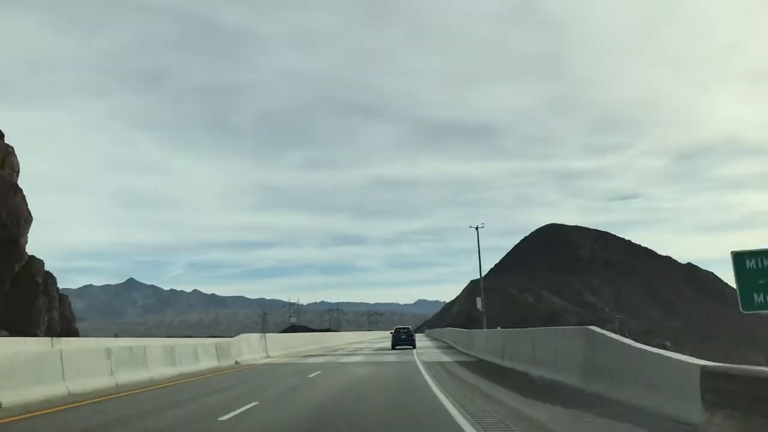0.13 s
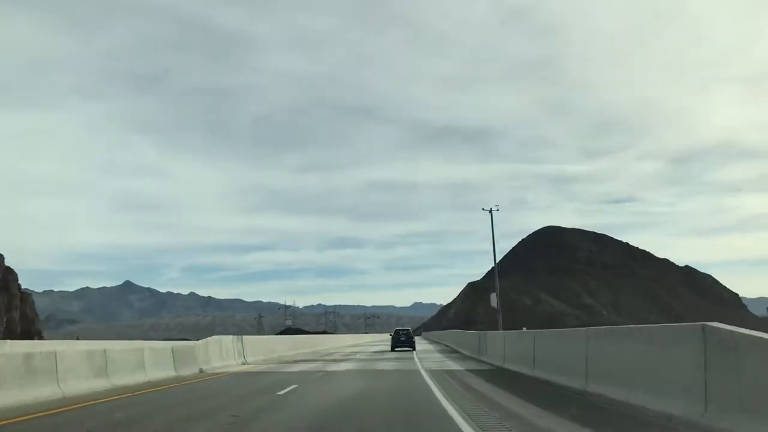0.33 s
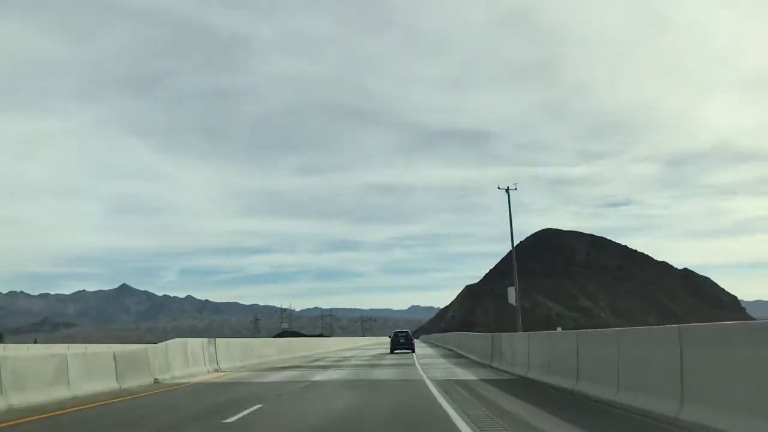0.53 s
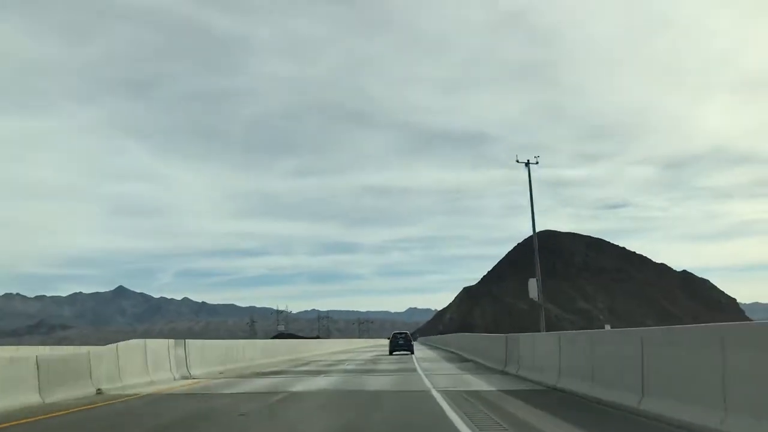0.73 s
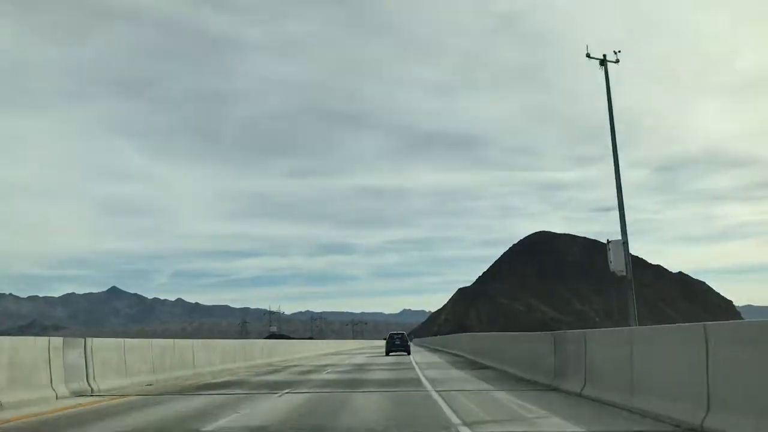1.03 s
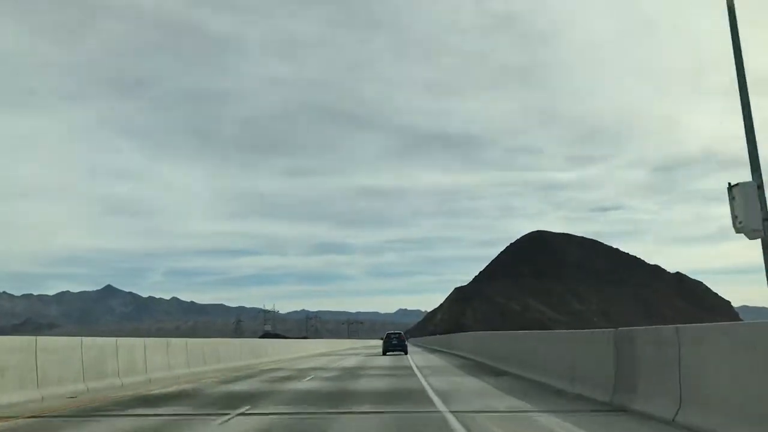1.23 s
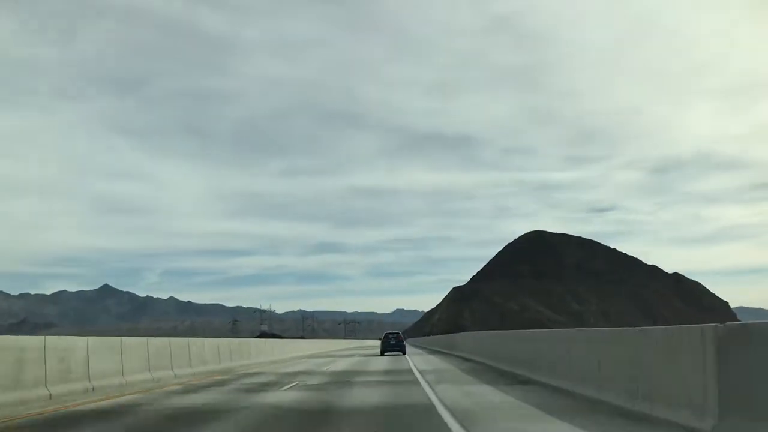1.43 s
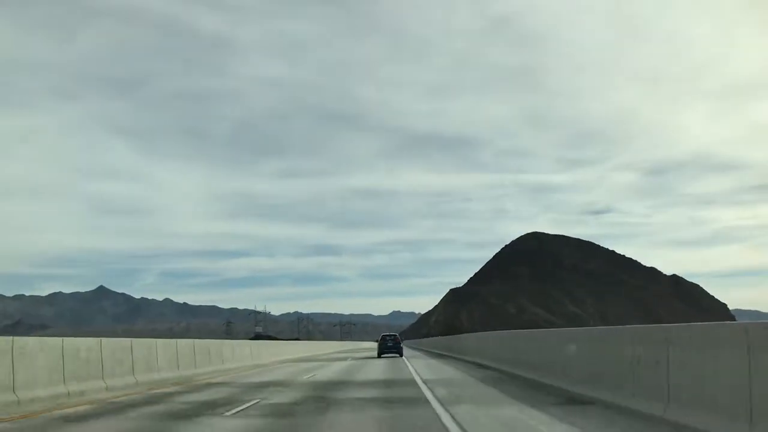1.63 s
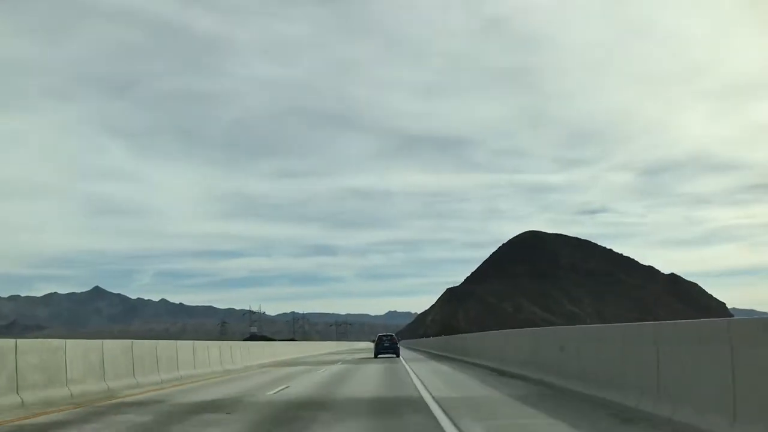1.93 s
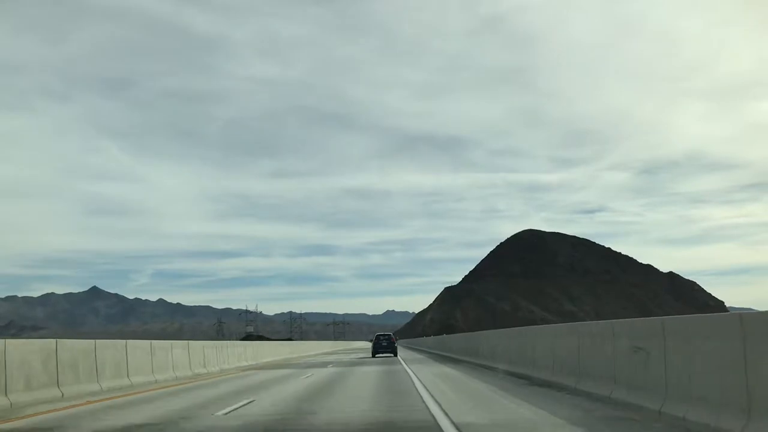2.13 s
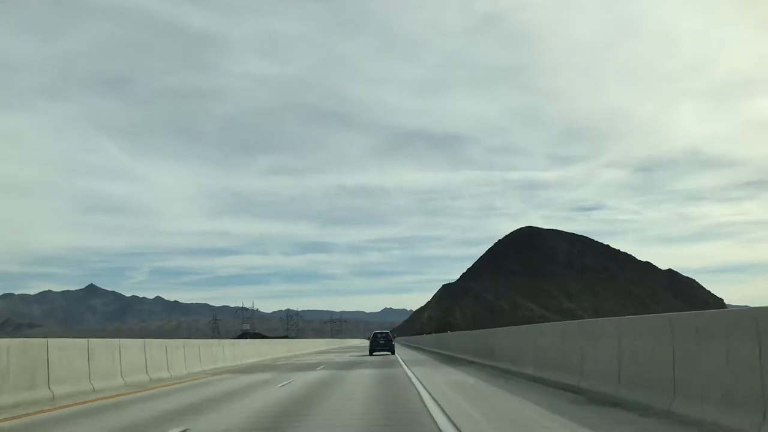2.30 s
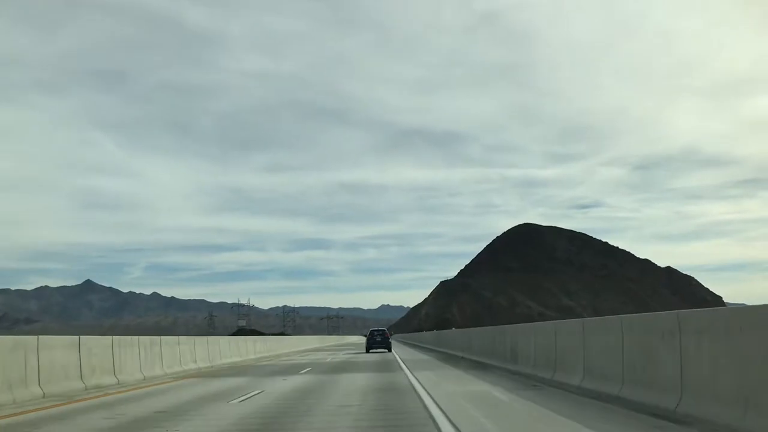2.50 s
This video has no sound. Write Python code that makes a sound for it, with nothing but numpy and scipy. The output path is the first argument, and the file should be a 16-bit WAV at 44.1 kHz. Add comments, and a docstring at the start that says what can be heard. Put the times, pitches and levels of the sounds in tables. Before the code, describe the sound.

Car rumbling along a highway, heard inside, with tyres thumping over bridge joints midway.

```python
"""Inside a car at highway speed. Road grain shakes the cabin into a steady rumble under tyre roar, a soft
wind hiss and a thin whine. At 1.4 s the asphalt gives way to a concrete bridge deck, where the tread
starts to hiss and sing. From 1.5 to 2 s front and rear tyres cross two expansion joints: the tread
slaps, the suspension knocks, the steel plates clack and the cabin thumps. The body shudders after them,
and the tyre song swells to the end."""
import sys
import numpy as np
from scipy import signal
from scipy.fft import rfft, irfft
from scipy.io import wavfile

SR = 44100
rng = np.random.default_rng(int(sys.argv[2]) if len(sys.argv) > 2 else 0)


def inscribe(sig):
    """Save sig as 16-bit PCM at rate SR to the path in sys.argv[1].

    A 1-D sig is mono; a 2-D sig holds one channel per row.
    Samples are clipped to [-1, 1] before scaling.
    """
    pcm = np.round(np.clip(np.atleast_2d(sig).T, -1, 1) * 32767)
    wavfile.write(sys.argv[1], SR, pcm.astype(np.int16))


N = 117306

# faint top hiss: f/Hz, relative level/dB
HISS_SPECTRUM = [(3500, -8), (5500, 2), (9500, -1), (10300, -6), (11500, -1), (15500, -0.5)]
# its fader ride: t/s, level/dB
HISS_RIDE = [(0, -88.5), (1.54, -81), (1.56, -69), (2.54, -67.5), (2.57, -99)]
# fader ride of the thin whine: t/s, level/dB
WHINE_RIDE = [(0, -82), (1.0, -81.5), (1.2, -75), (1.35, -75), (1.4, -88), (1.46, -78), (1.81, -77.5),
              (1.88, -95), (2.3, -79)]
# air rushing past the glass: f/Hz, relative level/dB
WIND_SPECTRUM = [(1000, 3.5), (2200, -4), (2900, 2.5), (3400, -3.5), (4200, -12.5), (5000, -22),
                 (7500, -32.5), (15500, -35)]
# its fader ride: t/s, level/dB
WIND_RIDE = [(0, -52), (.14, -56), (.24, -52.5), (.45, -56), (.8, -58), (1.03, -56), (1.2, -54),
             (1.85, -56.5), (2.66, -54.5)]

# cabin rumble from the road grain: f/Hz, relative level/dB
RUMBLE_SPECTRUM = [(20, -28.5), (32, -8), (52, -3), (66, 2.5), (80, -6.5), (105, 0), (145, -9.5), (200, -9),
                   (270, -15.5), (330, -16.5), (430, -24), (800, -30.5), (1200, -37.5), (2200, -52.5),
                   (5000, -79)]
# its fader ride as the surface changes: t/s, level/dB
RUMBLE_RIDE = [(0, -27), (.1, -23.5), (.22, -26), (.4, -22.5), (.5, -25.5), (.8, -24), (.9, -25.5),
               (1.2, -25), (1.4, -25.5), (1.7, -27.5), (2.1, -25.5), (2.3, -27), (2.41, -23), (2.66, -25)]
# cabin and tyre-cavity resonances: f/Hz, width/Hz, level against the rumble/dB
BOOM_MODES = [(93.3, 11, -8.5), (114.6, 24, -8.5), (174.1, 11, -14.5), (226, 20, -18), (316, 37, -18)]
# midrange tyre roar: f/Hz, relative level/dB
ROAR_SPECTRUM = [(350, -10.5), (540, 1.5), (780, -3.5), (1000, -8.5), (1400, -21)]
# its fader ride: t/s, level/dB
ROAR_RIDE = [(0, -43.5), (.4, -48.5), (.8, -44.5), (1.2, -45), (1.5, -44), (1.75, -64.5), (2.2, -71.5),
             (2.66, -40)]
# tread hiss on concrete: f/Hz, relative level/dB
CONCRETE_SPECTRUM = [(300, -11), (680, -16.5), (950, -8), (1050, -12), (1600, -10), (2100, -18.5),
                     (2600, -21), (4500, -41)]
# tread tones on concrete: f/Hz, width/Hz, relative level/dB
SONG_MODES = [(790, 65, -1.5), (908, 140, 0.5), (984, 63, -6), (1520, 160, -7.5), (1959, 38, -11.5)]

# cabin thumps as a wheel lands or rebounds: t/s, f/Hz, level/dB, rise/s
CABIN_THUMPS = [(1.539, 103.5, -7.5, 0.016), (1.58, 82.5, -9, 0.015), (1.639, 89.8, -12.5, 0.012),
                (1.657, 86.2, -6.5, 0.016), (1.698, 90.2, -13.5, 0.02), (1.847, 101.8, -11, 0.023),
                (1.902, 81.6, -12, 0.015), (1.966, 90.3, -8.5, 0.014)]
# air ringing in a jolted tyre: t/s, f/Hz, level/dB, rise/s
TYRE_AIR_RINGS = [(1.54, 181, -13, 0.02), (1.625, 217.2, -21.5, 0.051)]
# the body shuddering on its springs: t/s, f/Hz, level/dB, rise/s
BODY_SHUDDERS = [(1.726, 39, -18.5, 0.055), (1.855, 42.8, -13.5, 0.0089), (1.956, 47.3, -16, 0.03),
                 (2.015, 46.2, -16, 0.036), (2.131, 38, -19.5, 0.036)]
# clacks of a joint's steel plate: t/s, level before muffling/dB, pitch ratio
PLATE_CLACKS = [(1.5375, -21, .62), (1.8462, -19, 0.84), (1.8505, -12.5, 0.94), (1.8618, -13.5, 0.99),
                (1.9505, -26, 0.87)]
# the plate's ring at pitch ratio 1: f/Hz, level against the clack/dB
PLATE_MODES = [(728, -18), (805, -18.5)]
# ping of the steel edge: f/Hz, width/Hz, relative level/dB
PING_MODES = [(2590, 90, 2), (3020, 120, -5)]
# a tyre hits a joint: t/s, knock level/dB, slap level/dB, slap pitch ratio, slap rise/s, tick level/dB
JOINT_HITS = [(1.531, -28.5, -25.5, .74, 0.0062, -61.5), (1.558, -22.5, -40.5, 1.52, 0.0052, -58.5),
              (1.639, -24, -38.5, 0.88, 0.02, -75.5), (1.8308, -24, -22.5, 1.032, 0.012, -48.5),
              (1.944, -22, -35.5, 0.925, 0.008, -59), (1.962, -36, -34.5, 0.88, 0.0059, -71)]
# hollow knock of tyre and suspension: f/Hz, width/Hz, relative level/dB
KNOCK_MODES = [(118, 17, -10), (162, 33, 2), (199.3, 6.4, 0), (240, 31, -2), (300, 90, -7)]
# tread slap at pitch ratio 1: f/Hz, width/Hz, relative level/dB
SLAP_MODES = [(292, 50, 1), (462, 60, -2.5), (560, 91, -4.5), (660, 80, -4.5), (725, 45, -2),
              (818, 110, -4), (1090, 290, -11)]
# bright tick just ahead of the slap: f/Hz, relative level/dB
TICK_SPECTRUM = [(1500, -25), (2350, -9), (2650, 5), (3100, 0), (3700, -4.5), (5000, -15.5), (9000, -34.5)]


def undb(db):
    """Decibels to gain."""
    return 10 ** (np.asarray(db) / 20)


def ride(t, points):
    """Gain of a fader moving through (t/s, level/dB) points."""
    return undb(np.interp(t, *np.array(points).T))


def shaped(gain):
    """Noise of rms 1 under a gain that depends on frequency."""
    f = np.arange(N // 2 + 1) * SR / N + 1e-9
    noise = irfft(rfft(rng.standard_normal(N)) * gain(f), N)
    return noise / np.sqrt(np.mean(noise ** 2))


def coloured(points):
    """Noise EQ'd through (f/Hz, level/dB) points, falling 12 dB an octave beyond both ends."""
    hz, db = np.array(points).T

    def gain(f):
        skirts = np.minimum(f / hz[0], 1) ** 2 * np.minimum(hz[-1] / f, 1) ** 2
        return undb(np.interp(np.log(f), np.log(hz), db)) * skirts
    return shaped(gain)


def ringing(modes, ratio=1):
    """Steep-sided resonances kept ringing by random shaking, transposed by ratio."""
    return shaped(lambda f: sum(undb(db) / np.sqrt(width) / (1 + ((f / ratio - hz) / width * 2) ** 2)
                                for hz, width, db in modes))


def waver(depth_db, rate_hz):
    """Gain that wanders at random by depth_db rms."""
    return undb(depth_db * shaped(lambda f: np.exp(-(f / rate_hz) ** 2)))


def burst(age, rise_s, decay_s):
    """Straight attack, exponential release."""
    return np.clip(age / rise_s, 0, 1) * np.exp(-np.maximum(age - rise_s, 0) / decay_s)


def swing(age, hz, rise_s):
    """A heavily damped mode that peaks at rise_s and dies away."""
    progress = np.maximum(age, 0) / rise_s
    return (progress * np.exp(1 - progress)) ** 2 * np.sin(2 * np.pi * hz * age)


def sheen(t, whine_hz=14852):
    """A faint top hiss and a thin, wavering whine."""
    hiss = coloured(HISS_SPECTRUM) * ride(t, HISS_RIDE)
    whine = np.sqrt(2) * np.sin(2 * np.pi * whine_hz * t) * ride(t, WHINE_RIDE)
    return hiss + whine * waver(depth_db=1.5, rate_hz=5)


def wind(t):
    """Air rushes past the glass in a soft, unsteady hiss."""
    return coloured(WIND_SPECTRUM) * ride(t, WIND_RIDE) * waver(depth_db=1.1, rate_hz=6.7)


def cabin_rumble(t):
    """The low bed: road grain shakes the cabin and keeps it and the tyre cavities booming."""
    rumble = coloured(RUMBLE_SPECTRUM)
    booms = sum(undb(db) * ringing([(hz, width, 0)]) for hz, width, db in BOOM_MODES)
    return (rumble + booms) * ride(t, RUMBLE_RIDE)


def tyre_roar(t):
    """Rolling tyres fill the midrange; the roar dips around the joints and comes back."""
    return coloured(ROAR_SPECTRUM) * ride(t, ROAR_RIDE) * waver(depth_db=1, rate_hz=11)


def deck_swell(t, start_s=1.4, fade_s=0.091, swell_db_per_s=5):
    """Gain of the tyre song as the car rolls onto the deck: a quick fade-in, then a wavering swell."""
    age = t - start_s
    return np.clip(age / fade_s, 0, 1) * undb(swell_db_per_s * age) * waver(depth_db=0.5, rate_hz=5.7)


def tyre_song():
    """The tread hisses and sings on concrete."""
    hiss = undb(-52) * coloured(CONCRETE_SPECTRUM)
    tones = undb(-49) * ringing(SONG_MODES)
    return hiss + tones


def body_jolts(t):
    """The weight under the hits: the cabin thumps, the tyre air rings, the sprung body shudders."""
    jolts = CABIN_THUMPS + TYRE_AIR_RINGS + BODY_SHUDDERS
    return sum(undb(db) * swing(t - start, hz, rise_s) for start, hz, db, rise_s in jolts)


def edge_ping(t, start_s=1.8295):
    """The tread first touches the steel edge: one bright ping ahead of the loudest clack."""
    return undb(-40.5) * ringing(PING_MODES) * burst(t - start_s, rise_s=0.0025, decay_s=0.0059)


def plate_clacks(t, base_hz=690, rise_s=0.0008, floor_cutoff_hz=1080):
    """Steel joint plates clack under the tyres and ring briefly, muffled by the car's floor."""
    clacks = np.zeros(N)
    for start, db, ratio in PLATE_CLACKS:
        age = t - start
        attack = swing(age, base_hz * ratio, rise_s)
        ring = sum(undb(mode_db) * np.sin(2 * np.pi * hz * ratio * age) for hz, mode_db in PLATE_MODES)
        clacks += undb(db) * (attack + ring * burst(age, rise_s, decay_s=0.027))
    return signal.sosfilt(signal.butter(8, floor_cutoff_hz, fs=SR, output="sos"), clacks)


def joint_hits(t, tick_lead_s=0.0088):
    """Each tyre ticks, slaps the joint with a short chatter and knocks the suspension."""
    hits = np.zeros(N)
    for start, knock_db, slap_db, ratio, rise_s, tick_db in JOINT_HITS:
        age = t - start
        contact = burst(age, rise_s, decay_s=0.024)
        tail = undb(-18) * burst(age, rise_s, decay_s=0.07)
        chatter = waver(depth_db=2, rate_hz=160)
        slap = ringing(SLAP_MODES, ratio) * (contact + tail) * chatter
        knock = ringing(KNOCK_MODES) * burst(age, rise_s=0.009, decay_s=0.049)
        tick = coloured(TICK_SPECTRUM) * burst(age + tick_lead_s, rise_s=0.0083, decay_s=0.031)
        hits += undb(slap_db) * slap + undb(knock_db) * knock + undb(tick_db) * tick
    return hits


def scene():
    """The mono mix from the front seat: the driving bed with the joint crossings on top."""
    t = np.arange(N) / SR
    on_deck = deck_swell(t)
    road = cabin_rumble(t) + on_deck * tyre_song() + tyre_roar(t)
    air = wind(t) + sheen(t)
    crossings = joint_hits(t) + plate_clacks(t) + edge_ping(t) + body_jolts(t)
    return (road + air + crossings)[None]


def record(dry):
    """Short fades at both ends and a steep high cut."""
    fade_s, high_cut_hz = 0.006, 15760
    t = np.arange(N) / SR
    to_nearest_end = np.minimum(t, t[::-1])
    fade = np.sin(np.pi / 2 * np.minimum(to_nearest_end / fade_s, 1))
    return signal.sosfilt(signal.ellip(10, .1, 80, high_cut_hz, fs=SR, output="sos"), dry * fade)


dry = scene()
out = record(dry)
inscribe(out)
```